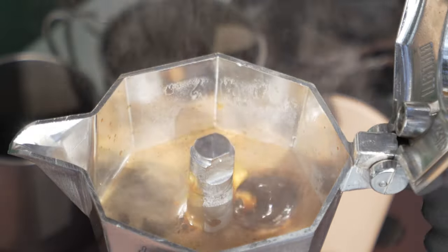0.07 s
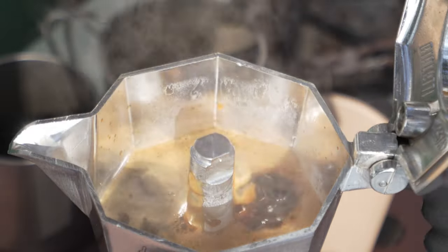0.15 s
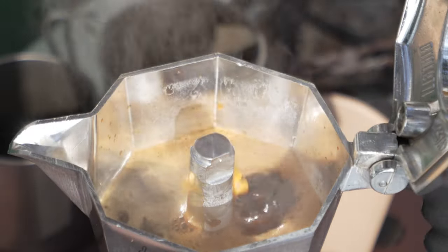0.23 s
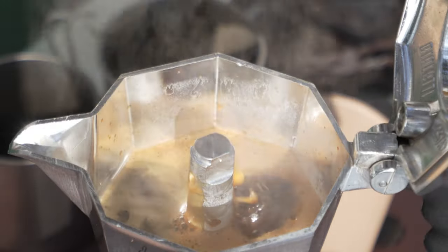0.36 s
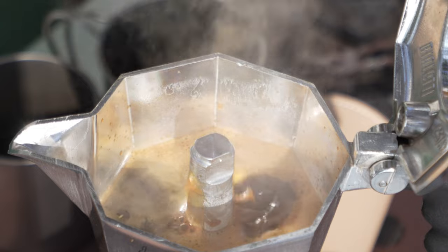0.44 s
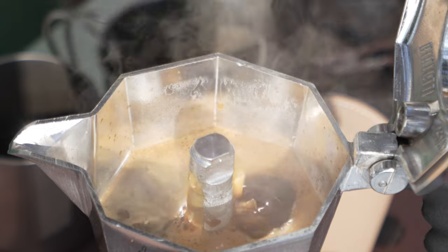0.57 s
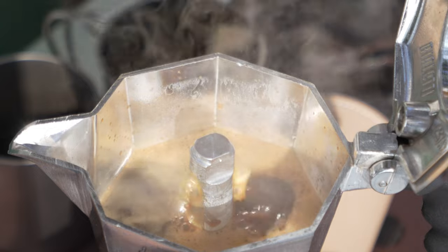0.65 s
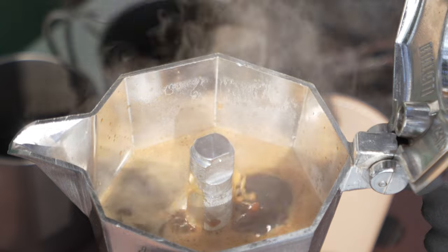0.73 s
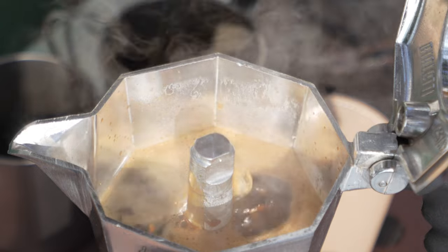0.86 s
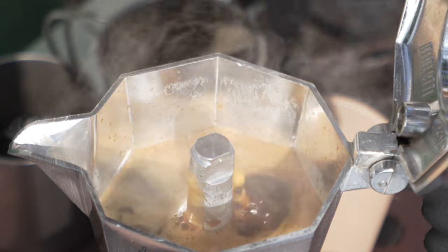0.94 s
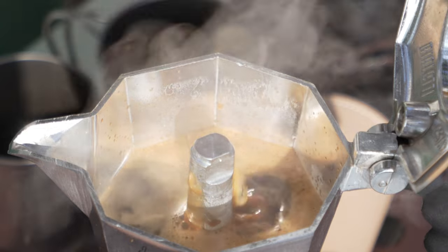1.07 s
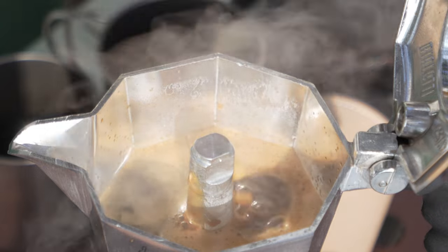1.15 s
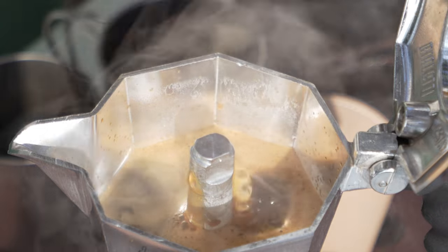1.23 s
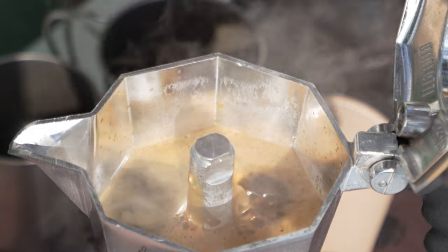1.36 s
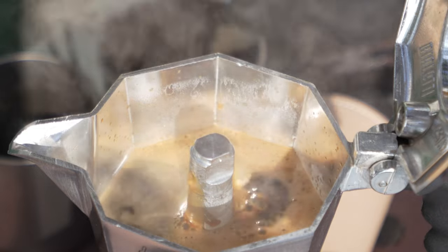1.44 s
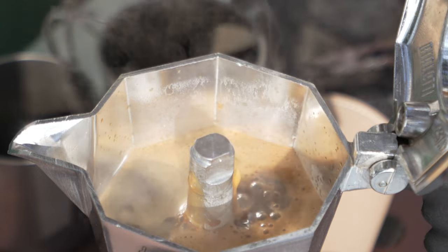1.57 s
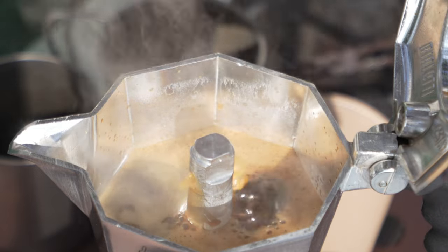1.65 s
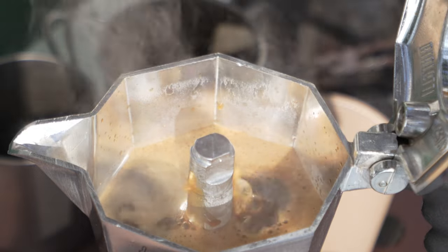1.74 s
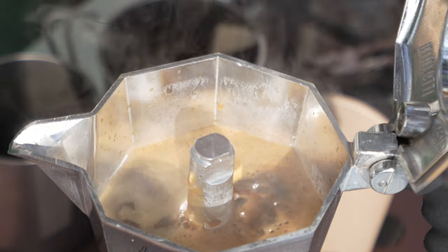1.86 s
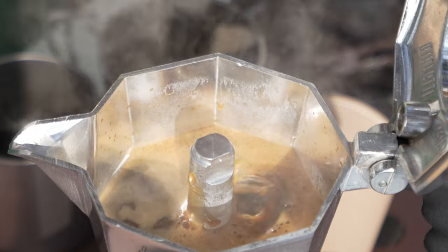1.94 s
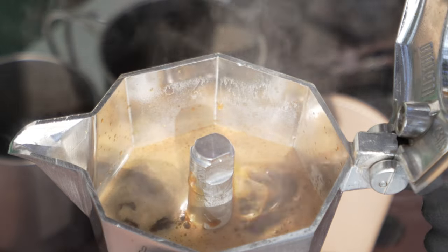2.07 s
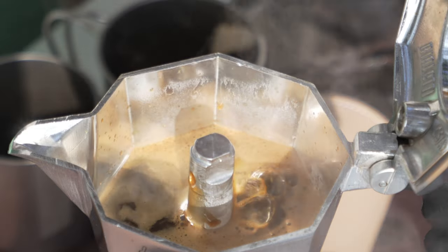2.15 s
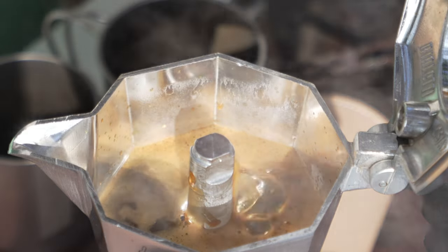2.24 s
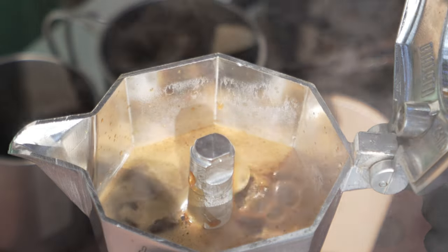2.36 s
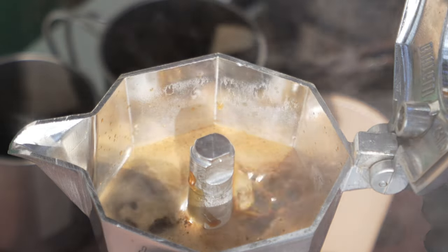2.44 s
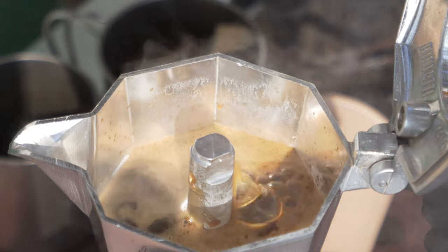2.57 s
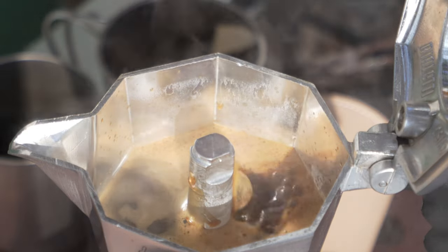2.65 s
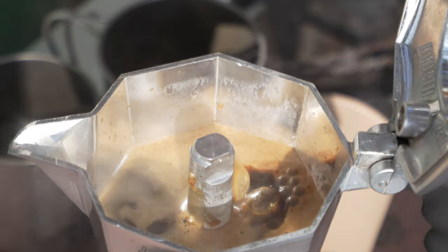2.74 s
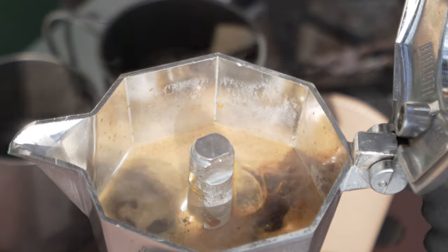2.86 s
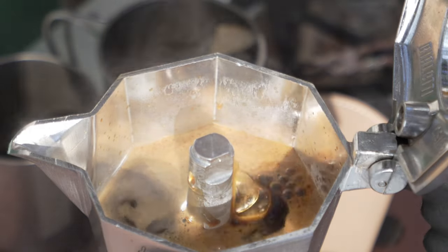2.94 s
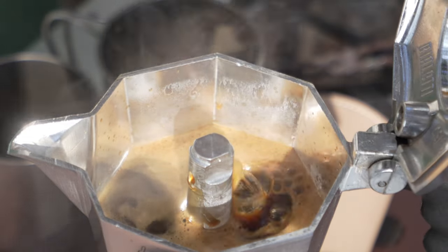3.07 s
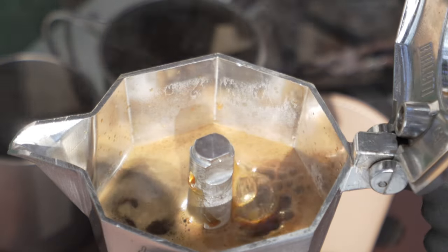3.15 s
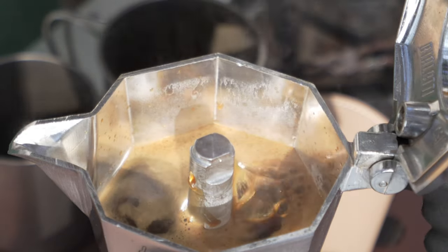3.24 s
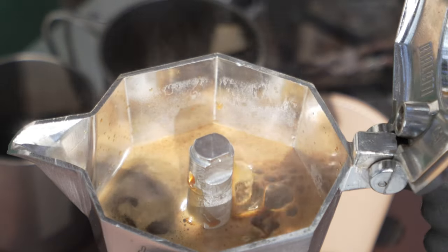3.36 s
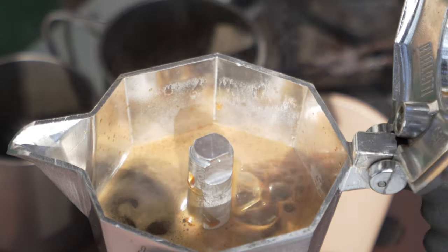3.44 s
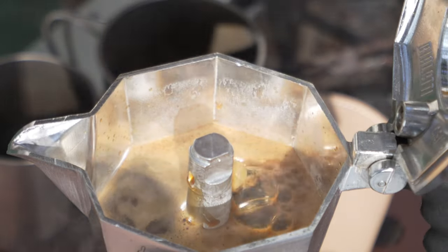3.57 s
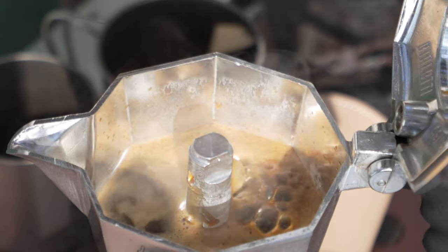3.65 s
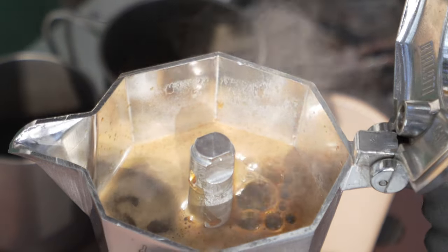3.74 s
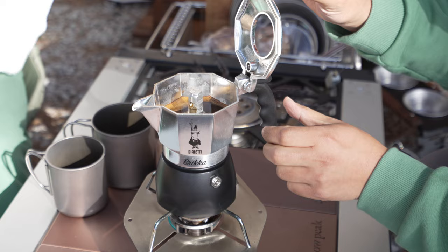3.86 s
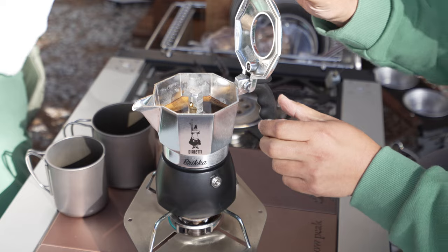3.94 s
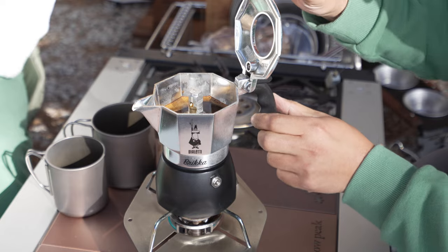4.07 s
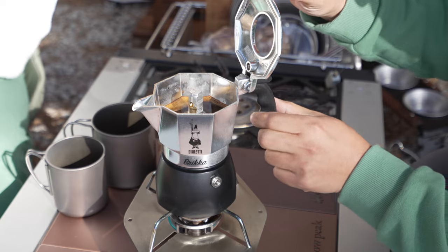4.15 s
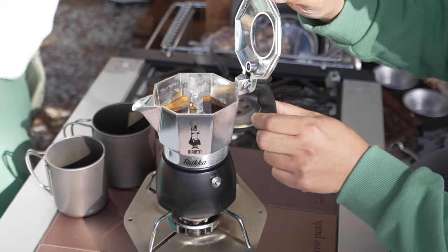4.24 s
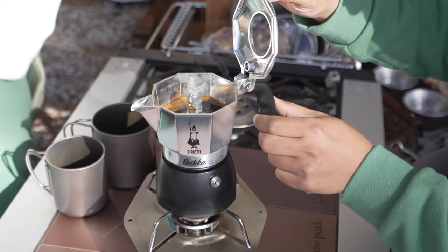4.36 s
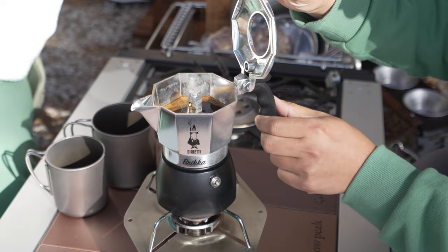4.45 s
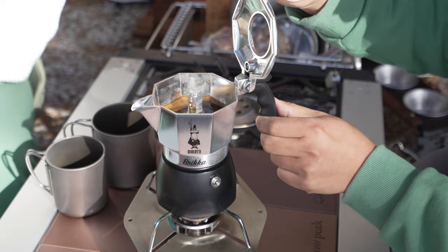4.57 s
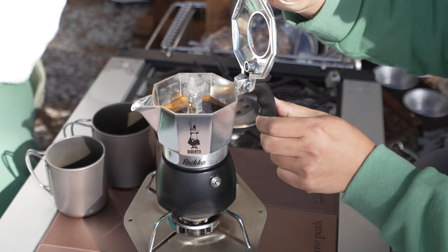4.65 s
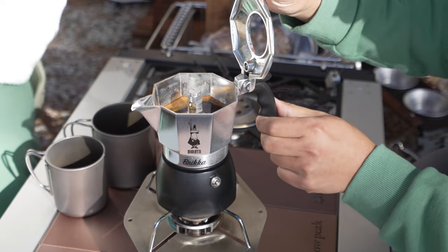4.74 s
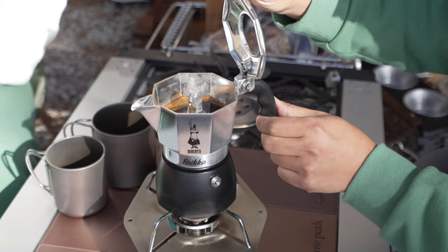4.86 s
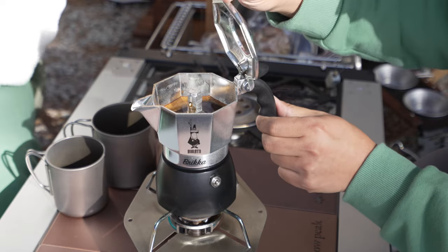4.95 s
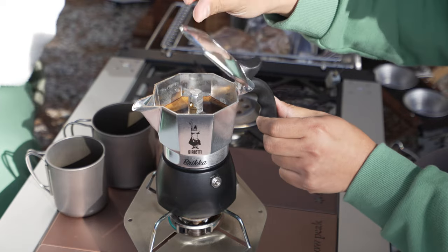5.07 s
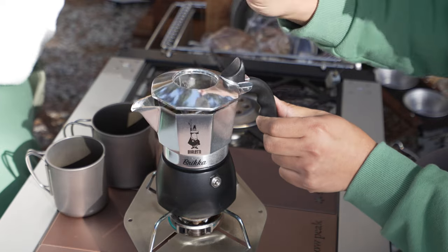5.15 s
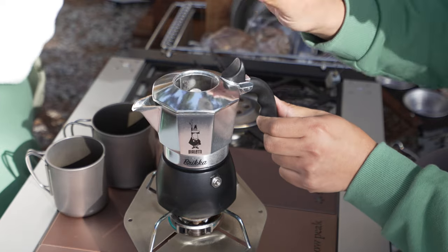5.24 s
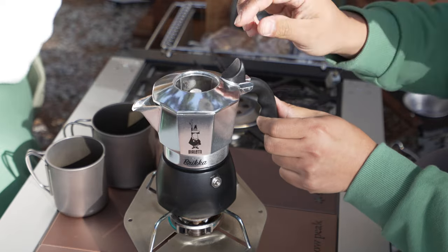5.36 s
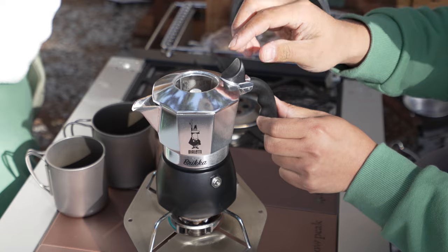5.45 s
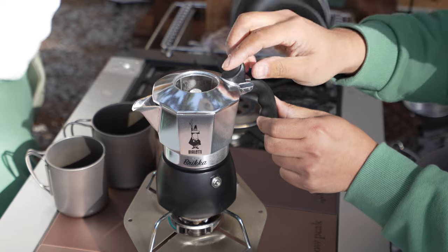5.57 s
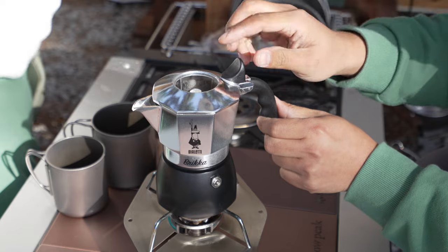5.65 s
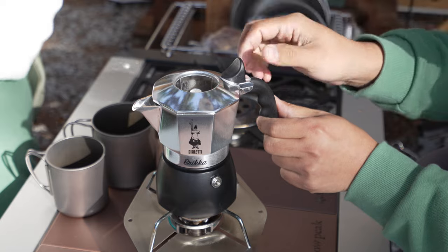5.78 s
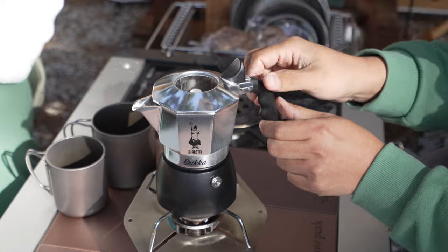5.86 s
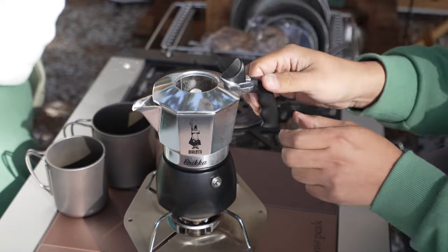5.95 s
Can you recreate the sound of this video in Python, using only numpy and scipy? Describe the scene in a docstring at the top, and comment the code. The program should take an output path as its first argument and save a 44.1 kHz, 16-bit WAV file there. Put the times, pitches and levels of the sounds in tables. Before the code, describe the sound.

From 0 to about 1.9 seconds, a brewing metal coffee pot is heard very close: rounded, hollow bubble pops and a wet gurgle resonate in the cup, with a bright steady hiss of steam. Around 1.9-2.1 the hiss surges and spits, then chokes back; the gurgle dries into a rasp. From 2.1 to 3.9 froth sizzles and crackles in rapid uneven bursts, thickening after 2.7 as the hiss recovers, with a few higher-pitched pops near 3.5-3.6. At 3.9 the close brewing cuts away to a more distant, quieter perspective. Soft steam puffs swell at about 4.1 and 4.4. Tiny hinge ticks at 5.06 and 5.12 precede a sharp metallic lid clap at 5.2, a second contact at 5.28 and rapidly fading bounces until about 5.35. Low gusty wind thumps the microphone over a faint burner rush throughout, which alone remains to 6 seconds.

```python
"""Moka pot on a windy camp stove

Close up, a coffee pot finishes brewing: bursting bubbles ring the open cup, from a wet gurgle to a dry rasp.
Steam hisses through the spout and blows out spits, beads and crackling froth; all of this is filtered noise.
Then, from farther off, two echoing puffs of steam escape and the lid ticks, claps shut and bounces;
its ring is a set of dying sine waves. A soft burner rush and low, gusty wind run throughout, as shaped noise."""
import sys
import numpy as np
from scipy import signal
from scipy.fft import rfft, irfft
from scipy.io import wavfile
from scipy.ndimage import uniform_filter1d, minimum_filter1d

SR = 44100
rng = np.random.default_rng(int(sys.argv[2]) if len(sys.argv) > 2 else 0)


def wrap_up_sound(samples):
    """Save the sound to the file named by the first command line argument, as 16-bit audio."""
    columns = np.atleast_2d(samples).T
    # keep every value between -1 and 1, then stretch to whole-number steps
    tamed = np.clip(columns, -1, 1)
    steps = np.round(tamed * 32767).astype(np.int16)
    wavfile.write(sys.argv[1], SR, steps)


N = 265041
T = np.arange(N) / SR  # time of every sample, s

# Table levels are starting points: the functions may trim, tilt or waver them.
# In a colour table, density is the relative strength at each frequency.

# the breeze at the microphone: (t/s, level/dB)
BREEZE_LEVEL = [(0, -48), (.55, -50), (.8, -42.5), (1, -45.5), (1.85, -44.5), (2.08, -42), (2.45, -52),
                (3.5, -51.5), (3.95, -39.5), (4.95, -37.5), (5.12, -43.5), (5.7, -54.5), (6, -44)]
# colour of the wind: (f/Hz, density/dB)
WIND_COLOUR = [(15, -24), (30, 0.5), (45, 2), (70, -1), (100, -4.5), (150, -13.5), (220, -23), (400, -39.5),
               (900, -62.5)]
# gusts striking the microphone: (t/s, length/s, level/dB, eddy f/Hz)
WIND_GUSTS = [(0.226, 0.02, -23.5, 66), (.381, 0.021, -29, 75), (.672, 0.031, -24.5, 65.5),
              (0.809, 0.049, -34.5, 55), (0.899, 0.029, -29.5, 70), (1.102, .02, -29.5, 75),
              (1.169, 0.019, -24.5, 70), (1.392, 0.037, -28, 66.7), (1.591, 0.015, -30.5, 70),
              (1.669, 0.039, -23.5, 73), (1.742, 0.045, -36, 55), (2.01, 0.053, -21, 70.5),
              (2.097, 0.042, -35.5, 55), (2.171, .022, -32, 60), (2.271, 0.031, -36, 70),
              (2.34, 0.024, -33, 70), (2.565, 0.037, -39, 55), (2.808, .025, -27.5, 61),
              (2.862, 0.037, -24.5, 45), (2.918, 0.016, -27, 70), (3.099, 0.011, -24, 73.5),
              (3.159, 0.0096, -23, 65), (3.348, 0.031, -26, 42.5), (3.879, 0.038, -29.5, 72),
              (4.021, .04, -28, 45), (4.298, .025, -34, 70), (4.54, 0.028, -32, 75),
              (4.732, 0.029, -27, 74), (5.202, 0.0091, -30, 72), (5.404, 0.042, -31.5, 49.2),
              (5.476, .016, -27, 56)]
# colour of burner and open air: (f/Hz, density/dB)
BURNER_COLOUR = [(30, -8.5), (150, 5.5), (400, 1), (700, 1), (1100, -1), (1600, -4), (2200, -6.5),
                 (2800, -8.5), (4900, -12), (5750, -14), (6000, -20), (8300, -21), (10000, -26.5),
                 (13000, -31.5), (16000, -34)]

# puffs of steam: (start t/s, rise/s, hold/s, fall/s, level/dB, delay of the table echo/ms)
STEAM_PUFFS = [(4.058, 0.058, 0.088, 0.16, -41, 1.4), (4.358, 0.086, 0.076, 0.11, -43.5, 2.2)]
# colour of the puffs: (f/Hz, density/dB)
STEAM_COLOUR = [(1500, -25), (2700, -1), (3900, 5), (4900, -5.5), (5500, -1), (8700, 1), (9500, -6),
                (11200, -7.5), (12700, -2), (13800, -10), (15500, -4.5)]
# the lid's hinge ticks: (t/s, level/dB)
HINGE_TICKS = [(5.059, -44.5), (5.1247, -43)]
# colour of a tick: (f/Hz, density/dB)
TICK_COLOUR = [(4000, -26), (8000, -6), (10500, 2), (12800, -5), (15000, -14)]
# the lid lands and bounces:
# (t/s, crack level/dB, ring level/dB, treble tilt/dB per octave, contact: 0 one edge, 1 flat on the rim)
LID_CLAPS = [(5.2057, 7, -9.5, -1, 0), (5.2803, -2, -7, 0.5, 0.97), (5.3093, -12.5, -17.5, 1.1, 1),
             (5.325, -17, -22, -0.5, 1), (5.3348, -23.5, -34, -5.5, 0.49), (5.343, -32, -37, -4, 0.79)]
# ringing tones of lid and pot: (f/Hz, time to fall 60 dB/s, edge-struck level/dB, flat-struck level/dB)
LID_MODES = [(1090, 0.068, -17, -12.5), (2880, 0.04, -2, -3), (3600, 0.049, -24, -14),
             (4580, 0.026, -22, -8), (5000, 0.026, 8.5, -12), (6200, 0.03, -7, -9),
             (6000, 0.045, -21, -9.5), (6700, .035, -14.5, -11.5), (7250, .028, -10, -20),
             (8500, 0.029, -6, 0.5), (8600, 0.027, -17, -5), (8850, .035, -14, -0.5),
             (9660, .028, -19, -12), (10670, .04, -4, -3), (11200, .04, -19, -5.5), (10800, 0.25, -25, -30),
             (11140, 0.22, -32, -29), (11640, .02, -6, -5), (11900, .033, -11, -6), (13160, .02, -15, -15),
             (14200, .02, 9, -6)]
# colour of the sharp crack: (f/Hz, density/dB)
CRACK_COLOUR = [(200, -45), (500, -16), (750, -5), (1020, 8.5), (1400, 0), (1750, -6), (2300, 0.5),
                (3000, 4), (4200, -1), (7000, 4), (12000, 2), (15000, -8), (16000, 5.5)]
# colour of the air shut in the cup: (f/Hz, density/dB)
KNOCK_COLOUR = [(300, -53), (550, -35), (760, -2), (1020, 0), (1200, -9), (1500, -13), (3000, -46)]
# so small a lid radiates no bass: (f/Hz, density/dB)
LID_RADIATION = [(100, -46), (350, -10), (650, 1.5), (20000, -0.5)]

CLOSE_END, CLOSE_FADE = 3.91, 0.027  # close-up sound has faded out by this time (s), over this long (s)
# how far steam has replaced liquid in the spout: (t/s, dryness 0-1)
SPOUT_DRYNESS = [(0, 0.04), (.7, 0.22), (1.85, 0.31), (2.02, 0.78), (2.5, 0.73), (2.8, 0.94), (3.9, 1)]
# short squirts of froth: (t/s, length/s, f/Hz, width/Hz, level/dB)
FROTH_SPITS = [(1.873, .028, 7400, 2200, -53), (1.944, 0.016, 6900, 1400, -37),
               (1.98, .02, 5500, 1500, -40), (2.043, .018, 14200, 2800, -47),
               (2.181, 0.022, 10900, 6000, -44.5), (2.252, .026, 8100, 900, -44),
               (2.383, .012, 7800, 900, -44), (2.69, .019, 6170, 2600, -45),
               (2.79, 0.15, 6160, 1510, -42.5), (2.979, 0.013, 9100, 5000, -35.5),
               (3.41, .015, 10500, 4500, -41), (3.875, 0.015, 7800, 1800, -42.5)]
# beads of froth passing the spout about twenty times a second: t/s
BEAD_TIMES = np.arange(2.12, 3.88, .05)
# froth sputters from the first time on, and thickens once the jet recovers: (t/s, level/dB)
FROTH_LEVEL = [(1.95, -54), (2.6, -50.5), (2.7, -42.5), (2.95, -48.5), (3.88, -50.5)]
# colour of the sputtering: (f/Hz, density/dB)
SPUTTER_COLOUR = [(2500, -32), (3400, 2.5), (4200, 4.5), (4800, -0.5), (5500, -8), (6500, -17), (9000, -43)]
# clots of froth that crackle louder: (t/s, length/s, level/dB)
FROTH_CLOTS = [(1.996, 0.024, -42), (2.078, 0.012, -40), (2.458, 0.018, -42), (2.82, 0.017, -39),
               (3.01, 0.012, -37), (3.128, 0.017, -33.5), (3.356, 0.023, -37), (3.602, 0.014, -41),
               (3.74, .035, -43)]
# the steam jet surges, chokes on froth and recovers: (t/s, level/dB)
JET_LEVEL = [(0, -41.5), (.72, -41), (1.25, -43.5), (1.55, -39.5), (1.78, -40.5), (1.88, -35.5),
             (2.13, -53.5), (2.62, -50.5), (2.72, -45), (3.4, -43), (3.88, -47.5)]
# resonances of the spout: (f/Hz, width/Hz, wet level/dB, dry level/dB)
SPOUT_MODES = [(5200, 300, -11, -33), (6430, 850, -1, 0.5), (7180, 1050, 3.5, -3.5), (7830, 760, -14, 0),
               (9030, 1040, -5.5, -7), (9910, 460, -7, -2.5), (10710, 970, -4.5, -5.5),
               (11560, 500, -13, -10), (12500, 440, -14, -7), (13500, 600, -28, -10)]
# colour bands of the finest spray: (f/Hz, width/Hz, level/dB)
MIST_BANDS = [(14740, 1700, 4), (15800, 500, 0)]
# stretches where the spout blows clear and sprays more: (start t/s, end t/s, extra level/dB)
CLEAR_SPRAYS = [(1.326, 2.06, 3), (2.88, 3.9, 10.5)]
# the largest bubbles: (t/s, level/dB, starting ring f/Hz)
LARGE_POPS = [(0.0256, -15.5, 1450), (0.0525, -21, 1500), (0.0763, -18.5, 1340), (0.0954, -18, 1370),
              (.1495, -35, 1310), (0.2163, -26, 1200), (.3006, -18, 1290), (.3849, -23, 1300),
              (.406, -20, 1300), (0.547, -15, 1300), (.819, -19.5, 1310), (1.1023, -21, 1350),
              (1.1932, -18, 1260), (1.3157, -22.5, 1360), (3.514, -21.5, 1840), (3.565, -22, 1930),
              (3.5952, -18, 3420), (3.6315, -18, 2100)]
# colour of a bubble's torn skin: (multiple of its ring f, density/dB)
SKIN_COLOUR = [(1 / 3, -20), (1 / 2, -6), (1.06, 0), (3, -22), (6, -35)]
# smaller bubbles: slots per second, middle level (dB), middle ring (Hz)
SMALL_POPS_PER_S, SMALL_POP_DB, SMALL_POP_HZ = 16, -27.5, 1294
# level of the bursting bubbles: (t/s, level/dB)
GURGLE_LEVEL = [(0, -32.5), (.55, -32.5), (1, -34.5), (1.78, -35.5), (2, -32.5), (2.22, -37.5),
                (2.38, -34.5), (3.25, -30.3), (3.45, -32.5), (3.88, -30.5)]
# air resonances of the cup, before its pitch rises: (f/Hz, width/Hz, wet level/dB, dry level/dB)
CUP_MODES = [(720, 236, -7.5, -34), (1264, 158, 2, -5), (1454, 257, -4, -4.5), (1887, 527, -7.5, -2),
             (2373, 480, -19.5, -8), (2680, 130, -26, -3.5), (3217, 405, -29, -4), (3730, 490, -58, -16.5)]


def amp(db):
    """Turns decibels into a multiplier."""
    return 10 ** (np.asarray(db) / 20)


def unit(x):
    """Scales a sound to an average (rms) strength of 1."""
    return x / np.sqrt(np.mean(x ** 2) + 1e-20)


def noise(count=N):
    """Makes white noise: every frequency equally strong on average."""
    return rng.standard_normal(count)


def curve(rows, t):
    """Reads a (time, value) table at times t, with straight lines between rows."""
    return np.interp(t, *np.transpose(rows))


def add(mix, s, sound):
    """Mixes a sound in at time s, cutting off what runs past the end."""
    part = mix[max(round(s * SR), 0):][:len(sound)]
    part += sound[:len(part)]


def colour(x, points):
    """Filters by a (frequency, dB) table; the filter rings only after its cause, and rms becomes 1."""
    hz, db = np.transpose(points)
    f = abs(np.fft.fftfreq(len(x), 1 / SR))
    log_gain = np.log(amp(np.interp(np.log(f + 1), np.log(hz), db)))
    # the Hilbert transform supplies the phase that puts the ringing afterwards
    response = np.exp(signal.hilbert(log_gain).conj())[:len(x) // 2 + 1]
    return unit(irfft(rfft(x) * response, len(x)))


def struck(points, envelope):
    """A strike is noise that dies by the envelope, then takes a colour; the envelope sets its energy."""
    return colour(noise(len(envelope)) * envelope, points) * np.sqrt(np.mean(envelope ** 2))


def humps(f, modes):
    """Resonances boost bands (frequency, width, dB) with steep sides; mean power gain is 1."""
    power = 0
    for hz, width, db in modes:
        power = power + amp(db) ** 2 / (1 + 2 * ((f - hz) / width) ** 2) ** 3
    return np.sqrt(power / power.mean(0))


def shape(x, gain, size=1024):
    """Passes x through a moving filter gain(frequency, time)."""
    overlap = size - size // 4
    f, t, spectrum = signal.stft(x, SR, nperseg=size, noverlap=overlap)
    filtered = spectrum * gain(f[:, None], t)
    return signal.istft(filtered, SR, nperseg=size, noverlap=overlap)[1][:len(x)]


def waver(hz):
    """Makes smooth random motion, mostly slower than hz; rms 1."""
    f = np.fft.rfftfreq(N, 1 / SR)
    return unit(irfft(rfft(noise()) * np.exp(-(f / hz) ** 2), N))


def wet_to_dry(modes, t):
    """Blends each resonance's wet and dry levels by the dryness of the moment."""
    dry = curve(SPOUT_DRYNESS, t)
    return [(hz, width, wet_db + dry * (dry_db - wet_db)) for hz, width, wet_db, dry_db in modes]


def bursts(per_s, unevenness, spread_db, rise_s=.0004):
    """Bubbles burst one after another at uneven gaps, each a quick rise and fall of pressure; rms 1."""
    gaps, sizes = rng.standard_normal((2, N // 64))
    gaps = np.exp(unevenness * gaps)
    at = np.cumsum(gaps / gaps.mean()) / per_s
    inside = at < T[-1]
    strengths = amp(spread_db * np.clip(sizes, -2, 1.5))
    train = np.bincount((at[inside] * SR).astype(int), strengths[inside], N)
    u = T[:2048] / rise_s
    return unit(signal.oaconvolve(train, u * np.exp(-u))[:N])


def crackle(per_s=600, fizz=0.2):
    """Dense tiny bursts of froth make noise crackle, over a little steady fizz; rms 1."""
    return unit(noise() * (fizz + bursts(per_s, unevenness=.7, spread_db=3)))


def wind(breeze_db=0.5, lumps_db=3.0, lumps_hz=14, churn_db=-3, swing_db=3, bright_db=-0.06):
    """Lumpy low turbulence follows the breeze; each gust adds a churn and one smooth pressure swing."""
    breeze = amp(curve(BREEZE_LEVEL, T) + breeze_db + lumps_db * waver(lumps_hz))
    out = colour(noise(), WIND_COLOUR) * breeze
    lead = .2  # s of sound before a gust's middle
    t = np.arange(-lead, lead, 1 / SR)
    # a slight tilt, bright_db per octave
    churn_colour = [(hz, db + bright_db * np.log2(hz)) for hz, db in WIND_COLOUR]
    for s, length, db, hz in WIND_GUSTS:
        churn = struck(churn_colour, np.exp(-2 * (t / length) ** 2))
        u = (np.pi * hz * t) ** 2
        swing = rng.choice([-1, 1]) * (1 - 2 * u) * np.exp(-u)
        add(out, s - lead, amp(db) * (amp(churn_db) * churn + amp(swing_db) * swing))
    return out


def burner(close, close_db=2, level_db=-48.5, flicker_db=0.98):
    """Gas flame and open air make a rush of noise that flickers slightly and is louder close up."""
    level = level_db + close_db * close + flicker_db * waver(hz=25)
    return colour(noise(), BURNER_COLOUR) * amp(level)


def puffs(echo=0.26, second_echo=0.2, second_ms=0.71, flutter_db=1.0):
    """Steam puffs are swelling hiss; short echoes off pot and table give them a hollow colour."""
    out = np.zeros(N)
    for s, rise, hold, fall, db, echo_ms in STEAM_PUFFS:
        hiss = colour(noise(), STEAM_COLOUR)
        corners = s + np.cumsum([0, rise, hold, fall])
        # the hiss never quite stops outside the puff
        swell = np.interp(T, corners, [0.13, 1, 0.84, 0.16]) ** 2
        echoes = echo * np.interp(T - echo_ms / 1000, T, hiss)
        echoes += second_echo * np.interp(T - second_ms / 1000, T, hiss)
        out += amp(db) * swell * unit(hiss + echoes)
    return out * amp(flutter_db * waver(hz=90))


def lid(crack_t60=0.021, snap_db=2, snap_t60=0.004, tail_db=-36, tail_t60=0.41, knock_db=-7, knock_t60=0.018):
    """The hinge ticks, then each clap is a crack, a hollow knock, ringing metal and a faint scatter."""
    lead = .02  # s of silence before each strike
    out, t = np.zeros(N), T[:SR // 2] - lead

    def decay(t60):
        """A strike starts at 1 and falls 60 dB in t60 seconds."""
        return (t >= 0) * amp(-60 * abs(t) / t60)

    for s, db in HINGE_TICKS:
        add(out, s - lead, amp(db) * struck(TICK_COLOUR, decay(.025)))
    for s, crack_db, ring_db, tilt_db, flat in LID_CLAPS:
        # a snap, the crack itself, and a long tail scattered from things nearby
        dying = amp(snap_db) * decay(snap_t60) + decay(crack_t60) + amp(tail_db) * decay(tail_t60)
        tilted = [(hz, db + tilt_db * np.log2(hz / 5000)) for hz, db in CRACK_COLOUR]
        clap = amp(crack_db) * struck(tilted, dying)
        clap += amp(ring_db + knock_db - 2 * tilt_db) * struck(KNOCK_COLOUR, decay(knock_t60))
        # where the lid lands decides which modes speak
        for (hz, t60, edge_db, flat_db), phase in zip(LID_MODES, rng.random(len(LID_MODES))):
            struck_db = edge_db + flat * (flat_db - edge_db)
            level = ring_db + struck_db + tilt_db * np.log2(hz / 5000)
            clap += amp(level) * decay(t60) * np.sin(2 * np.pi * (hz * t + phase))
        add(out, s - lead, clap)
    return colour(out, LID_RADIATION) * np.sqrt(np.mean(out ** 2))


def spits():
    """Froth squirts out in short crackles, each filtered to its own pitch."""
    out, f = np.zeros(N), np.fft.rfftfreq(N, 1 / SR)
    froth = rfft(crackle())
    for s, length, hz, width, db in FROTH_SPITS:
        squirt = irfft(froth * humps(f, [(hz, width, 0)]), N)
        out += amp(db) * np.exp(-2 * ((T - s) / length) ** 2) * squirt
    return out


def beads(level_db=-46, hz=7900, scatter_hz=450, width_hz=700, length_s=0.0055, jitter_s=0.029, spread_db=5):
    """Beads of froth blown through the drying spout sizzle one by one, each at its own pitch."""
    out, t = np.zeros(N), T[:2048]
    f = np.fft.rfftfreq(len(t), 1 / SR)
    for s, (late, pitch, size) in zip(BEAD_TIMES, rng.uniform(-1, 1, (len(BEAD_TIMES), 3))):
        band = humps(f, [(hz + scatter_hz * pitch, width_hz, 0)])
        sizzle = unit(irfft(rfft(noise(len(t))) * band))
        swell = np.exp(-((t - t.mean() - late * jitter_s / 2) / length_s) ** 2)
        add(out, s, amp(level_db + spread_db * size) * sizzle * swell)
    return out


def sputter(level_db=-0.5, clot_db=-2.0, fade_s=0.04, flutter_db=4.0, flutter_hz=22):
    """As the pot runs dry, froth crackles unevenly at the spout, louder as each clot passes."""
    onset = np.clip((T - FROTH_LEVEL[0][0]) / fade_s, 0, 1)
    steady = onset * amp(curve(FROTH_LEVEL, T) + level_db + flutter_db * waver(flutter_hz))
    clots = sum(amp(db + clot_db) * np.exp(-((T - s) / length) ** 2) for s, length, db in FROTH_CLOTS)
    return colour(crackle(), SPUTTER_COLOUR) * np.hypot(steady, clots)


def jet(level_db=-0.9, mist_db=-13.5, spray_rise_s=.05, drift_db=2.0, drift_hz=7, flutter_db=2.0, patch_db=2.5):
    """Steam hisses through the spout; passing froth makes it flutter and shifts its colour."""
    def froth(f, t):
        """Froth makes random patches of the hiss louder or softer."""
        patches = uniform_filter1d(noise((len(f), len(t))), size=5, axis=0)
        return amp(patch_db * unit(uniform_filter1d(patches, size=18, axis=1)))

    flow = unit(shape(noise(), froth, size=256) * amp(flutter_db * waver(hz=135)))
    hiss = shape(flow, lambda f, t: humps(f, wet_to_dry(SPOUT_MODES, t)))
    mist = shape(flow, lambda f, t: humps(f, MIST_BANDS))
    spray_db = 0
    for start, end, db in CLEAR_SPRAYS:
        spray_db = spray_db + db * np.clip(np.minimum(T - start, end - T) / spray_rise_s, 0, 1)
    mist_level = mist_db + spray_db + drift_db * waver(drift_hz)
    return amp(curve(JET_LEVEL, T)) * (amp(level_db) * hiss + amp(mist_level) * mist)


def small_pops(spread_db=6.0, spread=0.026):
    """Smaller bubbles need liquid, so fewer of these random pops come as the spout dries."""
    rows = []
    for k, (late, chance, size, pitch) in enumerate(rng.random((int(SMALL_POPS_PER_S * CLOSE_END), 4))):
        s = (k + late) / SMALL_POPS_PER_S
        if chance < (1 - curve(SPOUT_DRYNESS, s)) ** 2:
            db = SMALL_POP_DB + spread_db * (2 * size - 1)
            rows.append((s, db, SMALL_POP_HZ * (1 + spread * (2 * pitch - 1))))
    return rows


def pops(level_db=-3, rise_s=0.00098, glide=0.041, splash=0.23):
    """Each bubble rings for a few cycles, gliding upward, with a splash from its torn skin."""
    out, t = np.zeros(N), T[:600]
    u = t / rise_s
    envelope = (u / 2) ** 2 * np.exp(2 - u)  # peaks at 1
    for s, db, hz in list(LARGE_POPS) + small_pops():
        cycles = hz * t * (1 + glide * t / t[-1])
        ring = np.sin(2 * np.pi * (cycles + rng.random()))
        skin = colour(noise(len(t)), [(hz * ratio, skin_db) for ratio, skin_db in SKIN_COLOUR])
        add(out, s, amp(db + level_db) * envelope * (ring + splash * skin))
    return out


def lull(depth=0.27, lead_s=0.0046, length_s=0.0026):
    """The gurgle sinks briefly while a large bubble swells, just before its pop."""
    return 1 - depth * sum(np.exp(-((T - s + lead_s) / length_s) ** 2) for s, db, hz in LARGE_POPS)


def gurgle(wet_fizz=1.0, dry_fizz=1.63, rise=0.029):
    """Bursting bubbles and the fizz between them ring the cup, whose pitch rises as it fills."""
    dry = curve(SPOUT_DRYNESS, T)
    fizz = wet_fizz + dry * (dry_fizz - wet_fizz)
    burst = bursts(per_s=150, unevenness=.35, spread_db=2)
    drive = noise() * np.sqrt((burst ** 2 + fizz ** 2) / (1 + fizz ** 2))

    def cup(f, t):
        """The cup's resonances move up together; dryness stands in for how full it is."""
        return humps(f / (1 + rise * curve(SPOUT_DRYNESS, t)), wet_to_dry(CUP_MODES, t))

    return shape(drive, cup) * amp(curve(GURGLE_LEVEL, T))


def scene():
    """The brewing pot is heard close up, then the wider scene, all in the wind."""
    close = np.clip((CLOSE_END - T) / CLOSE_FADE, 0, 1)
    around = wind() + burner(close) + puffs() + lid()
    brew = spits() + beads() + sputter() + jet() + pops() + gurgle() * lull()
    return (close * brew + around)[None]


def record(dry, ceiling_db=-11, recovery_db=105, edge_hz=15830):
    """A limiter turns down loud moments and recovers by some dB a second; then the top treble is cut."""
    power = abs(uniform_filter1d(dry[0] ** 2, size=100))
    over_db = 10 * np.log10(power + 1e-12) - ceiling_db
    # hold each overshoot, letting it sink at the recovery rate
    held_db = np.maximum(np.maximum.accumulate(over_db + recovery_db * T) - recovery_db * T, 0)
    # widen and smooth the dip, so that it starts just ahead of the peak
    duck_db = uniform_filter1d(minimum_filter1d(-held_db, size=161), size=65)
    low_pass = signal.firwin(511, edge_hz, window=("kaiser", 9), fs=SR)
    return signal.oaconvolve(dry * amp(duck_db), low_pass[None], "same")


dry = scene()
out = record(dry)
wrap_up_sound(out)
```